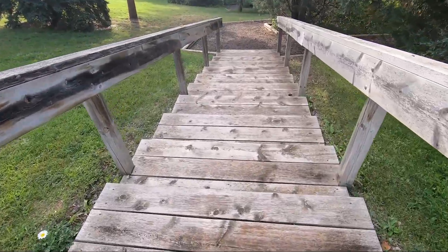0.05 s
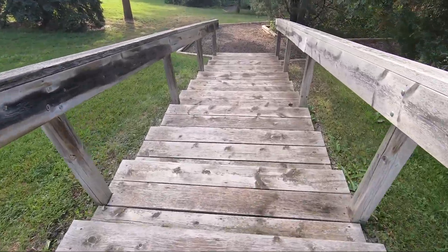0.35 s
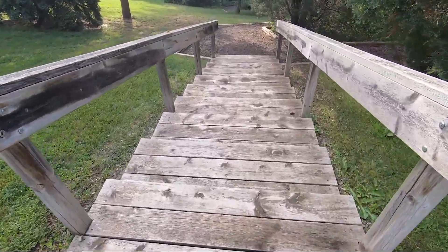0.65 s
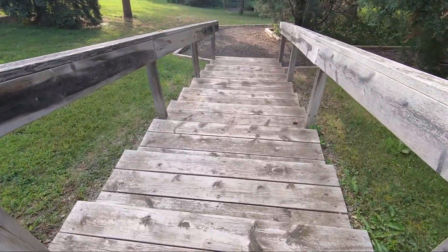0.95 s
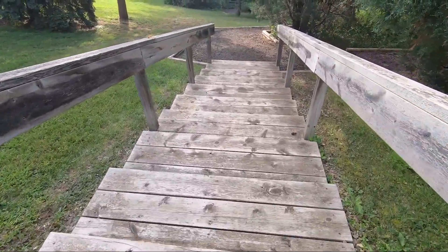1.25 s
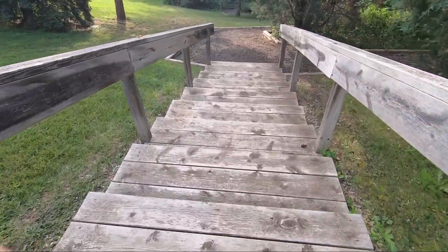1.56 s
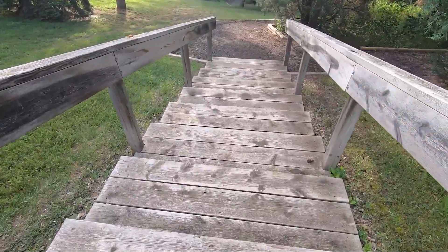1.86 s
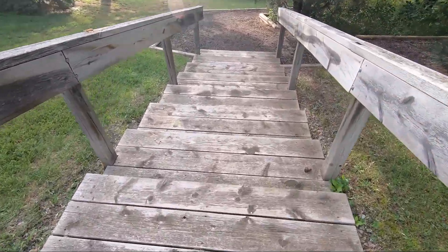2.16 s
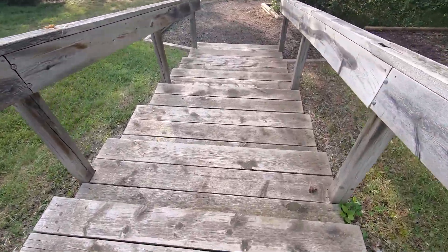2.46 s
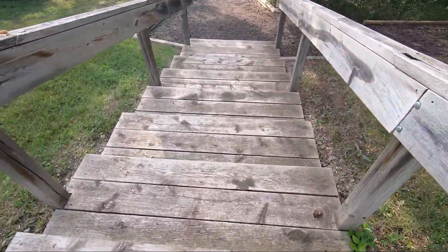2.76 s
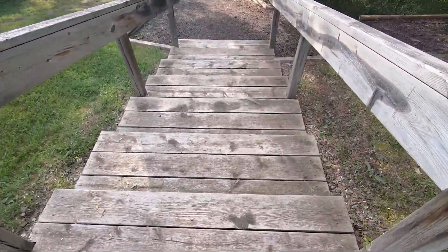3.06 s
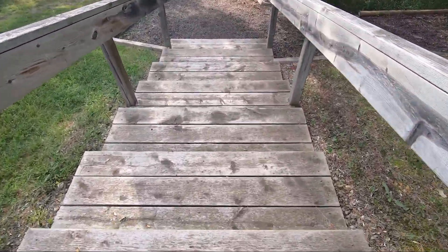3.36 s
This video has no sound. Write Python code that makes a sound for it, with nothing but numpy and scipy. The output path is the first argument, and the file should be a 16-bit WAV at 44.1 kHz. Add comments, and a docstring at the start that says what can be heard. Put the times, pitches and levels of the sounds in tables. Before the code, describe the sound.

Shoes thud and clack on wooden steps as someone carrying the microphone walks down five treads in a garden. The first board groans briefly, clothing swishes and ticks midway, and low air rumble and a faint hum continue throughout.

```python
"""Someone walks down five steps of an outdoor wooden staircase, holding the microphone.
From the start, a far hum lies under the garden's soft wash, clothes rustle and air rumbles.
The first tread (the board you step on) groans briefly. At every step the toe knocks a different
tread and sets it ringing, the sole slaps flat, the heel settles, and the other shoe scuffs off the
step above. Midway the clothes hiss and tick sharply; after the fifth step the background remains."""
import sys
import numpy as np
from scipy import signal
from scipy.fft import rfft, irfft
from scipy.io import wavfile
from scipy.ndimage import uniform_filter1d, map_coordinates

SR = 44100
rng = np.random.default_rng(int(sys.argv[2]) if len(sys.argv) > 2 else 0)


def generate_wav(sig):
    """Save sig (samples, or channels by samples) to the path in sys.argv[1] as 16-bit PCM at SR."""
    pcm = np.round(np.clip(np.atleast_2d(sig).T, -1, 1) * 32767).astype(np.int16)
    wavfile.write(sys.argv[1], SR, pcm)


N = 158760
T = np.arange(N) / SR
SHOT = T[:SR // 2]  # half a second of time for one short sound
CONTACT_RISE_S, SCUFF_RISE_S = 0.00025, 0.0041  # a hit starts faster than a rub
# tone colour (how strong each pitch is) of grit under a shoe (frequency [Hz], relative level [dB])
GRIT = [(500, 8.5), (1500, 4), (2600, 2), (3800, -0.5), (5300, -3), (7000, -14), (9500, -13.5),
        (15500, -39)]


def undb(db):
    """Turn decibels into a number to multiply by."""
    return 10 ** (np.asarray(db) / 20)


def unit(x):
    """Scale a signal to an average strength (rms) of 1."""
    return x / np.sqrt(np.mean(x ** 2))


def pan(db):
    """Left and right gains that make the left louder by db, keeping the total power."""
    return unit(undb(np.array([[db], [-db]]) / 2))


def add(out, s, x):
    """Mix x into out, starting at s seconds."""
    i = max(int(s * SR), 0)
    out[:, i:i + x.shape[-1]] += x[..., :N - i]


def curve(points):
    """Join (time, level) points with straight lines."""
    return np.interp(T, *np.array(points).T)


def bell(middle_s, half_s):
    """A smooth rise and fall around one moment."""
    return np.exp(-((T - middle_s) / half_s) ** 2)


def noise(colour, spread, size=N):
    """Stereo noise of a given tone colour; more spread makes left and right less alike."""
    hz, db = np.array(colour).T
    f = np.arange(size // 2 + 1) * SR / size
    gain = undb(np.interp(np.log(f + 1), np.log(hz), db))
    mid, side = irfft(rfft(rng.standard_normal((2, size))) * gain, size)
    return unit(np.array([mid + spread * side, mid - spread * side]))


def wander(rate_hz):
    """A smooth random drift, about 1 in size."""
    hold = max(int(SR / rate_hz), 1)
    jumps = rng.standard_normal(N)[np.arange(N) // hold]
    return unit(uniform_filter1d(uniform_filter1d(jumps, hold), hold))


def burst(colour, rise_s, decay_s, spread):
    """A short contact: noise that rises, then dies away."""
    shape = np.minimum(SHOT / rise_s, 1) * np.exp(-np.maximum(SHOT - rise_s, 0) / decay_s)
    return unit(shape * noise(colour, spread, size=len(SHOT))) * np.sqrt(np.mean(shape ** 2))


def resonate(x, hz, width_hz):
    """Make a sound ring around one pitch, keeping its energy."""
    ringing = signal.lfilter(*signal.iirpeak(hz, hz / width_hz, fs=SR), x)
    return unit(ringing) * np.sqrt(np.mean(x ** 2))


def swing(hz, peak_s):
    """One quick low wobble that swells until peak_s, then dies."""
    swell = SHOT / peak_s * np.exp(1 - SHOT / peak_s)
    return swell ** 2 * np.sin(2 * np.pi * hz * SHOT)


def garden():
    """A soft distant wash of noise and the wavering hum of a far machine."""
    # tone colour of the wash (frequency [Hz], relative level [dB])
    wash_colour = [(100, -6), (200, -1), (300, -2.5), (450, -10), (650, -9), (900, -9.5), (1300, -11),
                   (1850, -13), (2500, -22), (4000, -30.5), (8000, -57), (14000, -83)]
    # how the wash and the hum rise and fall (time [s], relative level [dB])
    wash_levels = [(0.0, -58), (0.72, -60), (1.04, -57.5), (1.76, -57.5), (1.94, -60.5), (2.4, -59.5),
                   (2.68, -63), (3.1, -56.5), (3.43, -61.5), (3.6, -60.5)]
    hum_levels = [(0, -58.5), (.6, -58), (1.1, -49), (1.4, -52.5), (2.15, -50), (2.72, -54.5), (3.2, -46.5),
                  (3.6, -57)]
    wash = undb(curve(wash_levels) + 5.5 + 0.5 * wander(17)) * noise(wash_colour, spread=0.63)
    hum_hz = 118.9 * (1 + 0.0081 * wander(5.7))
    hum = np.sqrt(2) * np.sin(2 * np.pi * np.cumsum(hum_hz) / SR)
    return wash + undb(curve(hum_levels) + 2 * wander(7.33)) * hum


def air():
    """Moving air rumbles on the microphone, and single puffs hit its left or right opening."""
    # tone colour of the rumble (frequency [Hz], relative level [dB])
    rumble_colour = [(15, -0.5), (30, 10.5), (55, 7), (90, 3.5), (140, -0.5), (200, -2.5), (300, -20.5),
                     (600, -43), (14000, -100)]
    # how the rumble rises and falls (time [s], relative level [dB])
    rumble_levels = [(0, -60), (.2, -45.5), (.4, -37.5), (.52, -59), (.7, -49), (.76, -39), (.86, -48),
                     (1.1, -47.5), (1.3, -50.5), (1.55, -46), (1.75, -38), (2.1, -50), (2.6, -47),
                     (2.72, -50), (3.1, -45), (3.6, -50.5)]
    # puffs (time [s], pitch [Hz], time to peak [s], level [dB], side [+1 left, -1 right])
    puffs = [(0.261, 82.6, 0.0066, -15, 1), (0.284, 53.2, 0.038, -27, 1), (1.716, 65, 0.014, -27, 1),
             (1.881, 32, 0.012, -15, -1)]
    out = undb(curve(rumble_levels) + 3) * noise(rumble_colour, spread=0.5)
    for s, hz, peak_s, db, side in puffs:
        add(out, s, undb(db) * pan(side * 15) * swing(hz, peak_s))
    return out


def clothes():
    """Rubbing cloth rustles all along, swishes with the stride and hisses more brightly midway."""
    # tone colours of the three cloth sounds (frequency [Hz], relative level [dB])
    rustle_colour = [(300, -4), (1200, 6.5), (3500, -2.5), (5200, 1.5), (7700, -6), (10000, -3),
                     (12500, -13.5), (14000, -27)]
    swish_colour = [(300, 12.5), (1200, 0.5), (3500, -3.5), (5200, -1.5), (7700, -12), (10000, -7),
                    (12500, -20), (15500, -33)]
    sleeve_colour = [(3800, -14), (5900, 4), (7500, -8.5), (9900, -2.5), (14000, -22)]
    # how the rustle rises and falls (time [s], relative level [dB])
    rustle_levels = [(0.0, -76.5), (0.22, -74), (0.82, -68.5), (0.98, -71.5), (1.2, -65.5), (1.52, -68.5),
                     (1.8, -69.5), (1.97, -83), (2.25, -70.5), (2.43, -66.5), (2.57, -70), (2.84, -71.5),
                     (3.16, -65), (3.33, -71.5), (3.6, -73.5)]
    # swishes (middle [s], half length [s], level [dB], left minus right [dB])
    swishes = [(0.181, 0.032, -64, -22), (0.769, 0.017, -55.5, 0), (1.337, 0.02, -46, 10),
               (1.435, 0.034, -51.5, 3.5), (1.695, 0.034, -47, 0), (1.877, 0.029, -51, -2),
               (3.292, 0.072, -61.5, 0)]
    rustle = undb(curve(rustle_levels) + 0.5) * noise(rustle_colour, spread=0.94)
    sleeve_gain = undb(-71 + 2 * wander(9.3)) * bell(middle_s=1.89, half_s=0.55)
    sleeve = sleeve_gain * noise(sleeve_colour, spread=1)
    stride = sum(undb(db) * pan(pan_db) * bell(s, half_s) for s, half_s, db, pan_db in swishes)
    swish = stride * noise(swish_colour, spread=0.82)
    flicker = undb(1.16 * wander(330) + 0.16 * wander(25.2))
    return (rustle + sleeve + swish) * flicker


def brushes_and_ticks():
    """Now and then cloth gives a gritty brush, or a sharp tick close to the microphone."""
    # tone colours of a brush and a tick (frequency [Hz], relative level [dB])
    brush_colour = [(300, 13.5), (1400, 3), (3300, 0.5), (5300, -1.5), (7500, -13), (10500, -13),
                    (15500, -38)]
    tick_colour = [(500, -9), (1300, -14), (2300, 1), (3600, -6.5), (4900, 2), (6200, -19), (7200, 0),
                   (8200, -12), (9400, 5.5), (11500, -7.5), (19000, -38)]
    # brushes (time [s], level [dB], left minus right [dB], fade time [s])
    brushes = [(.731, -41.5, -6, 0.011), (1.838, -46.5, 3, 0.0052), (1.883, -35, 14, 0.001),
               (3.199, -50, 3, 0.0018)]
    # ticks (time [s], level [dB], fade time [s], pitch [ratio])
    ticks = [(0.6363, -37.5, 0.0016, 0.77), (1.8808, -32.5, 0.0033, 1.), (1.8863, -20.5, 0.0006, 0.99)]
    out = np.zeros((2, N))
    for s, db, pan_db, decay_s in brushes:
        add(out, s, undb(db) * pan(pan_db) * burst(brush_colour, SCUFF_RISE_S, decay_s, spread=1))
    for s, db, decay_s, pitch in ticks:
        tick = burst(np.array(tick_colour) * [pitch, 1], CONTACT_RISE_S, decay_s, spread=1)
        add(out, s, undb(db) * pan(-5.5) * tick)
    return out


def loaded_wood():
    """The first tread groans as it takes the weight; treads bump softly as the weight shifts, and a low thump
    comes with the puff near 1.88 s."""
    # groans (middle [s], half length [s], pitch [Hz], level [dB])
    groans = [(0.225, 0.039, 243, -41.5), (0.244, 0.01, 153.3, -34.5)]
    # bumps (time [s], pitch [Hz], level [dB])
    bumps = [(.752, 63.7, -31), (0.789, 70.7, -30.5), (1.073, 77.5, -34), (1.872, 107, -28.5),
             (2.408, 62.7, -40)]
    out = np.zeros((2, N))
    for s, half_s, hz, db in groans:
        out += undb(db) * bell(s, half_s) * np.sin(2 * np.pi * hz * T)
    for s, hz, db in bumps:
        add(out, s, undb(db) * swing(hz, peak_s=0.0098))
    return out


def shoe_scuffs():
    """The rear shoe slides a moment as it leaves, then catches and rings the board."""
    # tone colour of the scrape (frequency [Hz], relative level [dB])
    scrape_colour = [(200, 8.5), (600, 4.5), (1100, 3.5), (2700, -6.5), (3700, -14.5), (7500, -18.5),
                     (10500, -17.5), (14000, -44)]
    # scuffs (time [s], level [dB], left minus right [dB], fade time [s], low ring [Hz],
    # high ring [Hz], relative low ring level [dB], relative grit level [dB])
    scuffs = [(0.415, -52, -18.5, 0.015, 1050, 1200, 6, -17), (.426, -37, -4, 0.004, 1210, 2400, -5, -15),
              (.722, -39.5, -2.5, 0.0071, 1490, 3450, -15, -1),
              (1.0726, -33, -5, 0.0024, 1210, 2400, -7, -17),
              (1.779, -33.5, -3.5, 0.0029, 2020, 2270, -8.5, -9),
              (2.421, -34, -3.5, 0.0033, 1625, 1780, -2, -5.5),
              (3.129, -34, -7, 0.0048, 1184, 2080, -0.5, -14),
              (3.155, -42.5, -2, 0.0022, 1090, 1200, -2, -20)]
    slide_s = 0.015
    out = np.zeros((2, N))
    for s, db, pan_db, decay_s, low_hz, high_hz, low_db, grit_db in scuffs:
        gain = undb(db) * pan(pan_db)
        scrape = burst(scrape_colour, SCUFF_RISE_S, decay_s, spread=0.66)
        low_ring = undb(low_db) * resonate(scrape, low_hz, width_hz=120)
        high_ring = undb(-3.5) * resonate(scrape, high_hz, width_hz=430)
        grit = undb(grit_db) * burst(GRIT, SCUFF_RISE_S, decay_s, spread=0.97)
        slide = undb(-14.5) * burst(scrape_colour, slide_s, decay_s, spread=0.93)
        add(out, s - slide_s, gain * slide)
        add(out, s, gain * (undb(-6) * scrape + low_ring + high_ring + grit))
    return out


def sole_slaps():
    """The sole slaps flat on the board with a woody clack."""
    # tone colour of the slap (frequency [Hz], relative level [dB])
    slap_colour = [(150, -16), (500, 3), (1000, 2), (1650, -1), (2400, -5), (3600, -13.5), (5500, -20),
                   (8000, -28.5), (14000, -44)]
    # slaps (time [s], level [dB], left minus right [dB], fade time [s], ring pitch [Hz])
    slaps = [(.327, -38, -13, 0.0049, 1650), (0.351, -43, -9, 0.006, 1480), (.955, -37, -5.5, 0.0045, 1530),
             (0.9757, -41.5, -7, 0.0047, 2100), (1.632, -40, -5, 0.0025, 1410),
             (1.6536, -30.5, -5, 0.0031, 1640), (1.6653, -35, -10, .003, 1180),
             (1.6712, -30, -4, 0.0027, 1800), (2.325, -44.5, -5, 0.024, 1870),
             (2.3382, -36.5, -7, 0.0028, 1600), (2.862, -45, -7, 0.026, 1810),
             (2.997, -37.5, -5, 0.0049, 1590), (3.013, -34.5, -9, 0.0024, 1300),
             (3.0174, -40, -4.5, 0.0087, 1750)]
    out = np.zeros((2, N))
    for s, db, pan_db, decay_s, hz in slaps:
        slap = burst(slap_colour, rise_s=0.00069, decay_s=decay_s, spread=0.51)
        ring = resonate(slap, hz, width_hz=360)
        add(out, s, undb(db) * pan(pan_db) * (undb(-4.5) * slap + undb(-3.5) * ring))
    return out


def footfalls():
    """The toe rings a tread and thuds the frame, the foot bends the board, the heel rings low tones."""
    # each tread's own tones, top tread first (pitch [Hz], relative level [dB], time to fade 60 dB [s])
    treads = [
        [(50.1, -28.5, 0.35), (87.3, -31, 0.65), (203, -23, 0.082), (323, -30, 0.067), (493, -26.5, 0.081),
         (764, -20, 0.038), (1343, -36, 0.049)],
        [(100.3, -28, 0.15), (189, -26, 0.16), (275, -29, 0.13), (341, -34, 0.1), (510, -28.5, 0.036),
         (862, -30, 0.047), (963, -21.5, 0.025), (1300, -34, 0.054)],
        [(85, -26, 0.27), (116.3, -27.5, 0.31), (175.5, -16.5, 0.065), (224, -22, 0.063), (466, -26.5, 0.06),
         (1073, -20, 0.034), (1385, -8, 0.011), (1594, -25, 0.025)],
        [(125, -29, 0.102), (164, -20, 0.091), (226.3, -19.5, 0.11), (264, -34, 0.13), (343, -35, 0.12),
         (1295, -17, 0.027), (1773, -36, 0.064)],
        [(61, -28.5, 0.12), (179.5, -24.5, 0.066), (227, -23.5, 0.051), (413.4, -28.5, 0.038),
         (474, -24, 0.031), (646, -28.5, 0.028), (783, -25, 0.026)],
    ]
    # toe knocks, one per tread (time [s], ring gain [dB], left minus right [dB], clack level [dB],
    # clack fade time [s], clack pitch [ratio], grit level [dB], thud level [dB],
    # wait until the ball of the foot bends the board [s], bend level [dB])
    toes = [(0.2668, -0.5, -8.5, -33, 0.0038, 0.93, -41.5, -32.5, .0022, -22.5),
            (0.8978, 1.5, -8, -31, 0.0066, 0.67, -42.5, -31.5, 0.007, -27.5),
            (1.5988, -0.5, -5.5, -24, 0.0042, 1.15, -36, -30.5, 0.004, -21),
            (2.2720, 0, -3, -25, 0.0045, 0.94, -41, -29, 0.0026, -18.5),
            (2.9526, 1.5, -4.5, -26, 0.0074, 0.94, -34, -30.5, 0.0051, -26.5)]
    # heel landings, one per tread (time [s], ring gain [dB])
    heels = [(.350, -8), (0.976, -10), (1.671, -4), (2.339, -2), (3.017, 3.5)]
    # tone colours of the toe's clack and the frame's thud (frequency [Hz], relative level [dB])
    clack_colour = [(100, -15), (400, -18), (650, -9), (1000, 0.5), (1400, -5.5), (1900, -1), (2350, -20),
                    (3500, -55), (8000, -37), (15000, -72)]
    thud_colour = [(40, 6), (80, 10), (150, 4), (230, 9.5), (330, -7), (450, -13.5), (900, -43),
                   (2000, -47), (14000, -99)]
    build_cycles, heel_soft_hz, pan_from_hz = 0.86, 320, 690
    out = np.zeros((2, N))
    for tones, toe, (heel_s, heel_db) in zip(treads, toes, heels):
        toe_s, ring_db, pan_db, clack_db, clack_s, pitch, grit_db, thud_db, bend_lag_s, bend_db = toe
        for hz, db, fade_s in tones:
            shape = (1 - np.exp(-SHOT * hz / build_cycles)) * np.exp(-np.log(1000) * SHOT / fade_s)
            sides = pan(pan_db / (1 + (pan_from_hz / hz) ** 4))  # low tones stay in the middle
            ring = undb(db) * shape * np.sin(2 * np.pi * hz * SHOT) * sides
            muffle = 1 / (1 + (hz / heel_soft_hz) ** 4)  # the softer heel barely rings high tones
            add(out, toe_s, undb(ring_db) * ring)
            add(out, heel_s, undb(heel_db) * muffle * ring)
        clack = burst(np.array(clack_colour) * [pitch, 1], CONTACT_RISE_S, clack_s, spread=0.63)
        grit = burst(GRIT, CONTACT_RISE_S, decay_s=0.0079, spread=0.6)
        thud = burst(thud_colour, rise_s=0.0074, decay_s=0.029, spread=0.11)
        add(out, toe_s, (undb(clack_db) * clack + undb(grit_db) * grit) * pan(pan_db))
        add(out, toe_s, undb(thud_db) * thud)
        add(out, toe_s + bend_lag_s, undb(bend_db) * swing(hz=190.7, peak_s=0.003))
    return out


def echo(feet):
    """Rails and ground scatter the steps back as a brief, quiet echo with little bass."""
    gap_s, decay_s, low_cut_hz = 0.004, 0.051, 420
    scatter = rng.standard_normal((2, len(SHOT))) * np.exp(-SHOT / decay_s) * (SHOT > gap_s)
    scatter /= np.sqrt(np.sum(scatter ** 2) / 2)
    scatter = signal.lfilter(*signal.butter(2, low_cut_hz, "high", fs=SR), scatter)
    return undb(-16.5) * signal.fftconvolve(feet, scatter, axes=1)[:, :N]


def scene():
    """Mix the steps, which reach the left side a little later, with their echo and all around them."""
    left_lag_s = 0.000025
    left, right = footfalls() + sole_slaps() + shoe_scuffs() + loaded_wood()
    late_left = map_coordinates(left, [(T - left_lag_s) * SR])
    feet = np.array([late_left, right])
    return feet + echo(feet) + clothes() + brushes_and_ticks() + air() + garden()


def record(dry):
    """The recorder cuts off the highest treble."""
    top_hz = 15400
    return signal.sosfilt(signal.ellip(8, 0.2, 80, top_hz, fs=SR, output="sos"), dry)


dry = scene()
out = record(dry)
generate_wav(out)
```